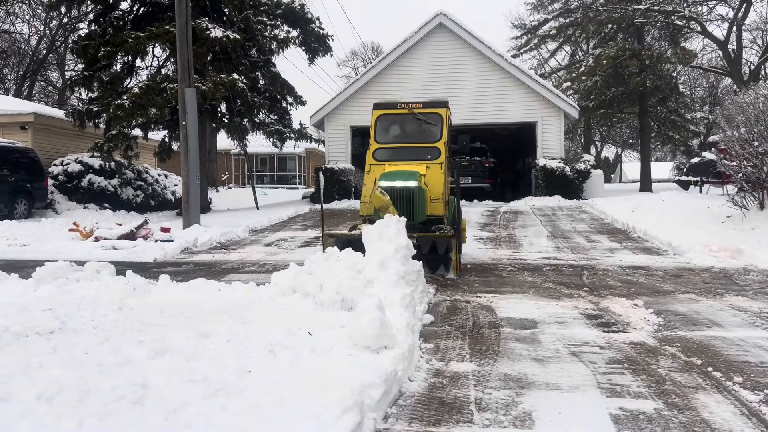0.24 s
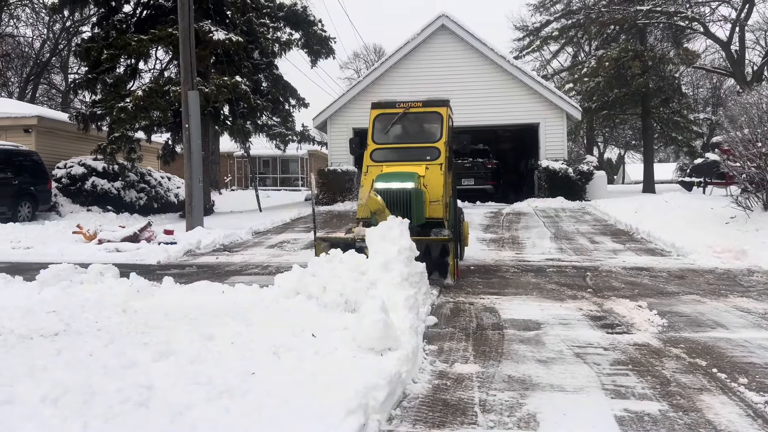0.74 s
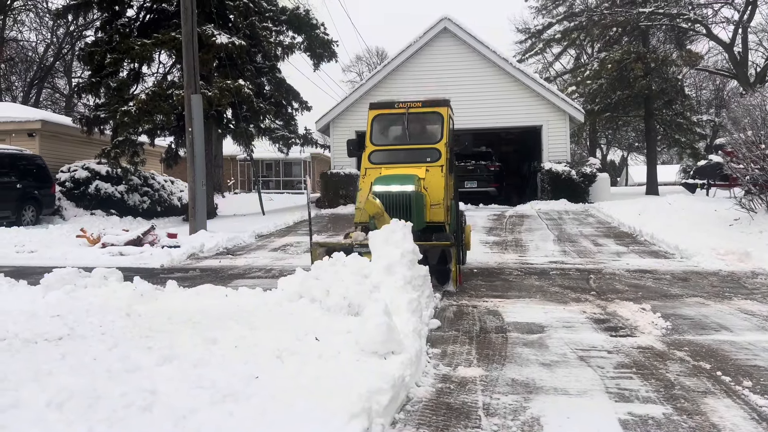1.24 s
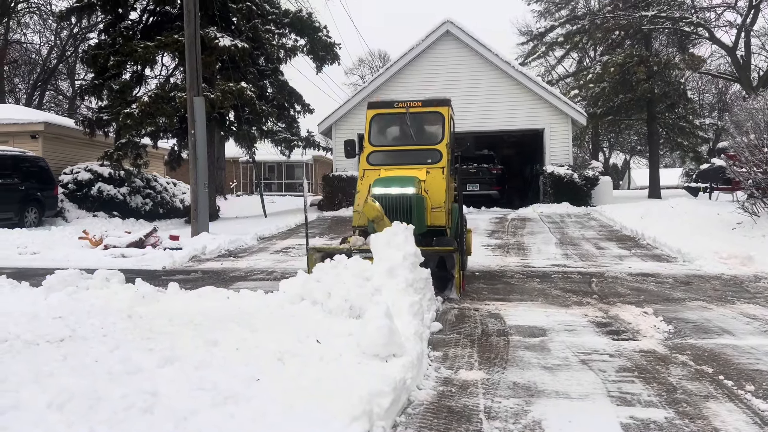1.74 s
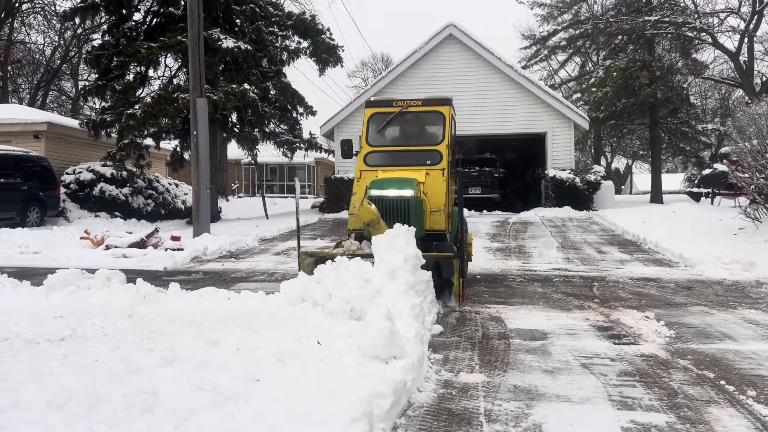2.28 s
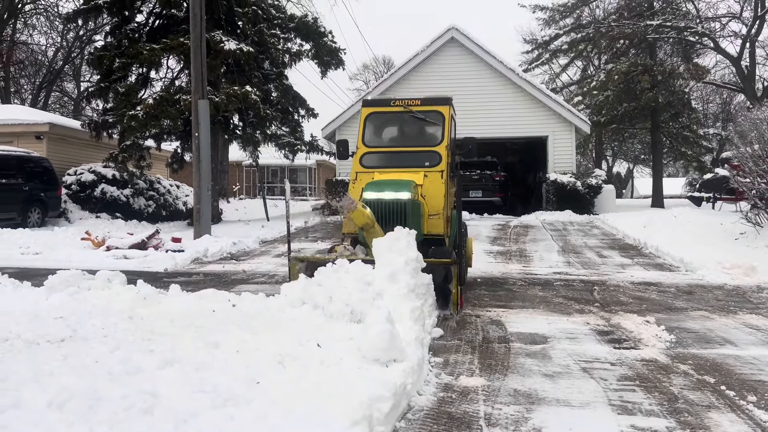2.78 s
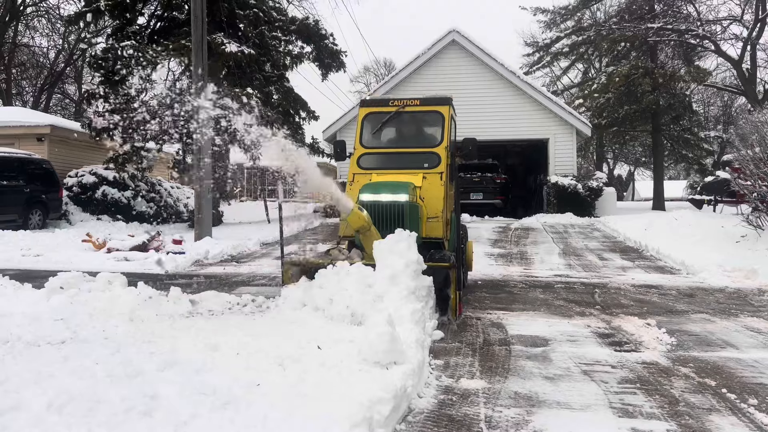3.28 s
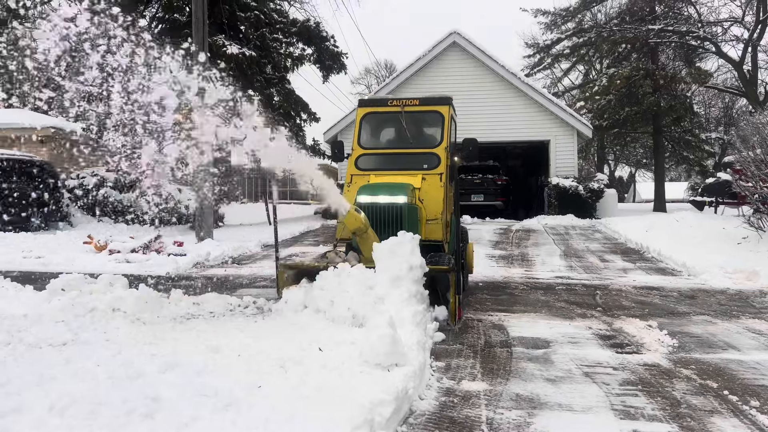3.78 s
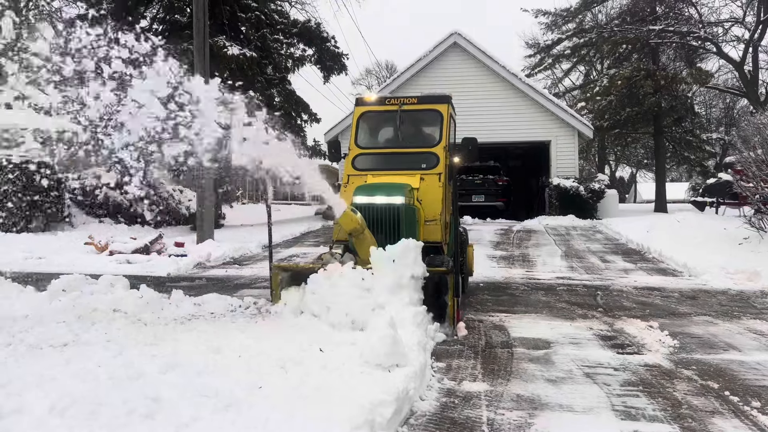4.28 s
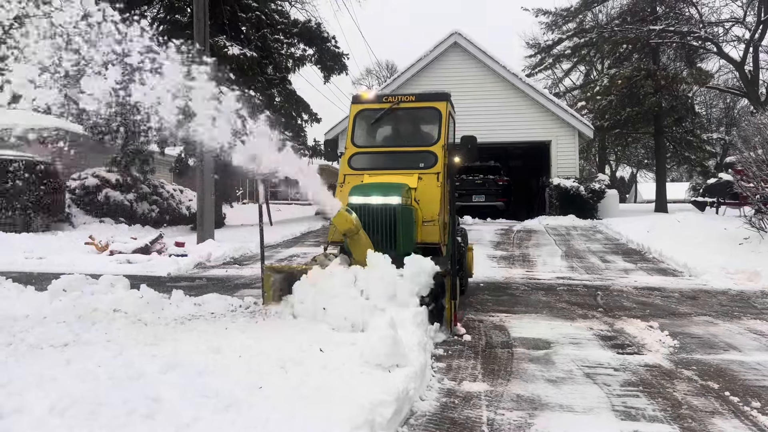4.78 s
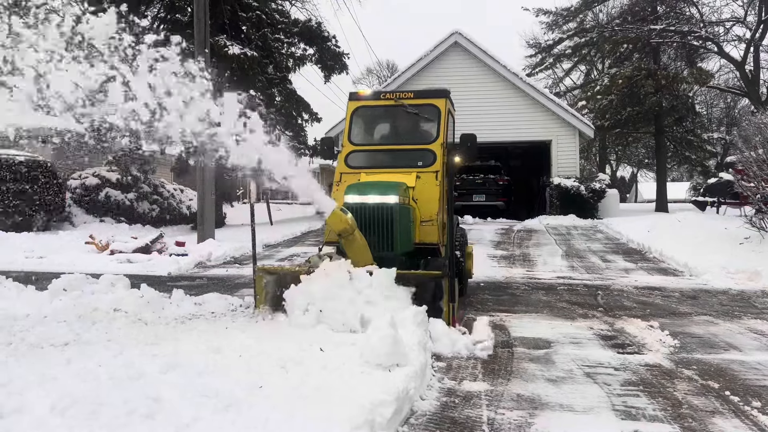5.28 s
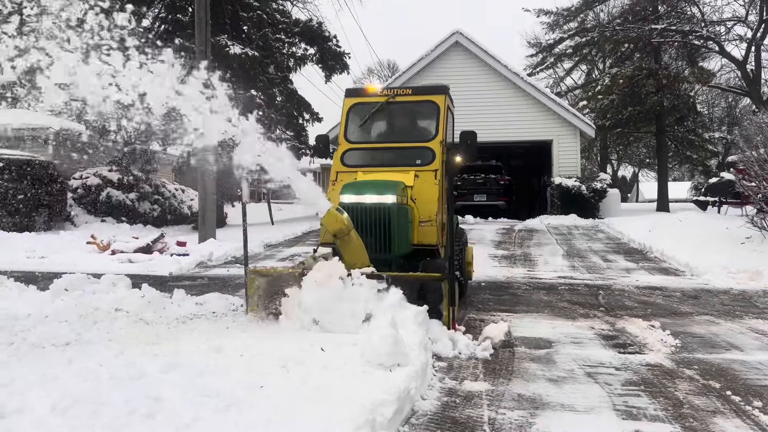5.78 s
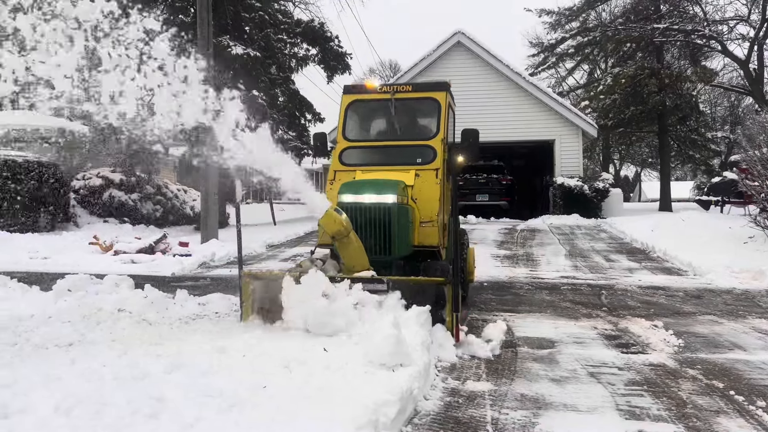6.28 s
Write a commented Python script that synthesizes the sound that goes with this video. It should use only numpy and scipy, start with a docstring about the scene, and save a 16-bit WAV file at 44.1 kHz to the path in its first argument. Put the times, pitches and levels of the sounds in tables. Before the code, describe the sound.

A low twin-cylinder exhaust throb and belt-driven blower run together, their close pitches beating slowly. Clatter and airy rush grow gradually. Midway the blower meets heavy snow, the engine sags and partly recovers, housing and gear case ring and buzz, and low churning surges join a bright pulsing spray. Heard in the open air, in stereo, from a few metres ahead, slowly approaching, without a stop.

```python
"""A hum with a slow beat comes first: the exhaust of a twin-cylinder garden tractor and its front snowblower.
The exhaust sums sines on the orders of the crank, which sags as the blower bites into a wet snow bank; the
belt-driven blower sums orders of a slightly slower shaft and beats against it. Gear meshes whine as sines on
multiples of the crank speed; knocks, roar, snow rush and spray are noise and blows gated once a turn and
filtered; noise rings the metal, snow lumps rumble, and two ports each hear all this with level and lag."""
import sys
import numpy as np
from scipy import signal
from scipy.fft import rfft, irfft, next_fast_len
from scipy.io import wavfile
from scipy.ndimage import uniform_filter1d

SR = 44100
rng = np.random.default_rng(int(sys.argv[2]) if len(sys.argv) > 2 else 0)


def materialize(psi):
    """Save the field psi as 16-bit PCM at rate SR to the path in sys.argv[1].

    A 1-D psi becomes a single channel; in a 2-D psi each row is a channel.
    """
    bounded = np.clip(np.atleast_2d(psi).T, -1, 1)
    quanta = np.round(bounded * 32767).astype(np.int16)
    wavfile.write(sys.argv[1], SR, quanta)


N = 287973
SIZE = next_fast_len(N)  # transform length, samples
TIME_S = np.arange(N) / SR
BITE_S, BITE_RISE_S = 3.0, .62  # the blower meets the bank; time to full load


def exhaust(turns, first_db, bite):
    """Harmonic synthesis: orders of the crank sum to a periodic hum; half orders come from uneven firing."""
    # exhaust orders above the first: (order, level at the outset [dB], growth on coming closer [dB/s],
    # lift under load [dB], waver [dB])
    exhaust_orders = [(2, -27, 1.45, -2, .4), (2.5, -44, .9, 4.5, 2.5), (3, -25.5, 0, 0, .3),
                      (3.5, -58, 0, 14, 3), (4, -42, 1.1, -.5, 2), (5, -50, .3, 10, 3),
                      (5.5, -53, .5, -1, 3), (6, -53, .3, 10, 1.5), (6.5, -49, .8, 2.5, 1.5),
                      (7, -51, 0, -1, 3), (7.5, -48, .8, -2.5, 2), (8, -48, 1, -4, 2),
                      (8.5, -51, .8, -6, 3), (9, -58, 0, 13, 2), (9.5, -52, 0, 1, 3), (10.5, -51, 1, 1, 2),
                      (11, -50, 0, .5, 2), (12, -47.5, 0, 0, 1.5), (12.5, -54, .5, -2, 3),
                      (13.5, -52, .5, -10, 2)]
    first = harmonic(turns, first_db, waver_db=0.33, order=1)
    return first + stack(turns, exhaust_orders, bite)


def blower(hz, bite):
    """Beating: belt slip, greater under load, slows this shaft, so its orders drift behind the exhaust's."""
    # blower orders: (order of its own shaft, level at the outset [dB], growth on coming closer [dB/s],
    # lift under load [dB], waver [dB])
    blower_orders = [(1.5, -49, 1.7, 3, 2.9), (2, -50.5, 1.35, 10.5, 1.2), (2.5, -50, .62, 14.5, 2),
                     (3, -44.5, 2, .5, 1.5), (3.5, -53, .7, 8.5, 1.8), (4, -45.5, 1.7, -1, 1),
                     (4.5, -50, 1.6, -5, 2.5), (5, -46.5, 2.6, -12.5, 2.5), (5.5, -50, 2.2, -11, 2),
                     (7.5, -62, 0, 13, 2), (10, -46, 0, -1, 3)]
    slip_light, slip_loaded = .0147, .018  # share of the crank speed lost in the belt
    behind_turns = .355  # lag of the blower's angle at the outset
    extra_db_per_hz, extra_below_hz = 1.5, 50.3  # extra lift only below 50.3 Hz, which this crank never reaches
    slip = slip_light + (slip_loaded - slip_light) * bite
    turns = np.cumsum(hz * (1 - slip)) / SR - behind_turns
    extra_db = extra_db_per_hz * np.maximum(extra_below_hz - hz, 0)
    return -undb(extra_db) * stack(turns, blower_orders, bite)


def stack(turns, orders, bite):
    """Superposition: the orders of one shaft add, each with its own growth, load lift and phase."""
    from_rad, per_order_rad = 1.0, -1.15  # phase at the outset for order 2; change per order
    to_rad, slide_s = -1.3, 3.8  # phase that orders up to 3 slide to; time taken
    aligned_orders = 3  # higher orders add a random offset
    tones = 0
    for order, db, closer_db, load_db, waver_db in orders:
        outset = from_rad + per_order_rad * (order - 2)
        slide = outset + (to_rad - outset) * ramp(0, slide_s)
        if order > aligned_orders:
            slide = slide + 2 * np.pi * rng.random()
        level_db = db + closer_db * TIME_S + load_db * bite
        tones = tones + harmonic(turns, level_db, waver_db, order, slide)
    return tones


def harmonic(turns, db, waver_db, order, slide=0):
    """Order tracking: a sine locked to the shaft angle, of wavering size and phase; db is its rms level."""
    phase_waver = .04  # radians per order
    phase = 2 * np.pi * order * turns + slide + phase_waver * order * walk(9)
    return -np.sqrt(2) * undb(db + waver_db * walk(10)) * np.sin(phase)


def gears(turns, hz, bite):
    """Tooth-mesh tones: lines at multiples of crank speed, blurred by frequency jitter, varying with load."""
    # gear meshes: (multiple of crank speed, peak level at the outset before the sag lift [dB],
    # growth on coming closer [dB/s], lift under load [dB], lift per crank sag [dB/Hz], blur [Hz])
    meshes = [(18.02, -49, 2.2, -12, 0, 1.), (18.42, -53, 1.9, 1.5, 3.5, 1.), (36.23, -72, 0, 28, 9, 1.),
              (38.1, -72, 0, 25, 7, 1.5), (55.35, -68, 1.5, 13, 0, 4)]
    mesh_hz, most_sag_hz = 52.4, 1.1  # sag counts from this crank speed; no more lift past this sag
    flicker_db = 1.3
    sag = np.clip(mesh_hz - hz, 0, most_sag_hz)
    tones = 0
    for multiple, db, closer_db, load_db, sag_db, blur_hz in meshes:
        drift = np.cumsum(blur_hz * walk(40)) / SR
        level_db = db + closer_db * TIME_S + load_db * bite + sag_db * sag
        level_db = level_db + flicker_db * walk(9)
        tones = tones + undb(level_db) * np.sin(2 * np.pi * (multiple * turns + drift))
    return tones


def rushes(turns, rattle_db, strain_db):
    """Superposition of broadband sources: engine noise, rush and spray of the chute, ringing metal."""
    # broadband levels: (time [s], low roar [dB], clatter [dB], air and snow rush [dB])
    roar_db, clatter_db, rush_db = played([(0, -29.5, -36, -38), (.5, -31.5, -36, -37),
                                           (1.4, -30.5, -35, -33.5), (2.2, -28.5, -33.5, -34.5),
                                           (3.0, -28.5, -33, -33.5), (3.7, -28.5, -33, -32.5),
                                           (4.4, -27, -31, -31), (5.4, -28, -31.5, -30.5),
                                           (6.53, -26.5, -30, -31.5)])
    engine = block(turns, roar_db, clatter_db)
    thrown = chute(turns, rush_db) + spray(turns, rush_db)
    return engine + thrown + housing(rattle_db, strain_db)


def block(turns, roar_db, clatter_db):
    """Amplitude modulation: noise throbs once a turn, joined by knocks, and is shaped into roar and clatter."""
    # low roar of fan and belts: (frequency [Hz], relative spectrum level [dB])
    roar_slope = [(30, -10), (45, -16), (65, 2.5), (100, 6.5), (150, 4.2), (220, 0.5), (350, -3.5),
                  (500, -1), (620, -3.5), (750, -8), (1000, -20), (3000, -65)]
    # clatter of block and blower: (frequency [Hz], relative spectrum level [dB])
    clatter_slope = [(200, -62), (500, -55), (750, 0), (1200, 0.5), (1600, -4.5), (2000, -3.5),
                     (2500, -9.5), (4000, -20), (9000, -60)]
    # resonances on the clatter: (frequency [Hz], width [Hz], lift [dB])
    clatter_rings = [(1155, 31, 6), (1270, 38, 4.5), (1471, 60, 8), (1587, 40, 6)]
    gate = 1 + 0.75 * puffs(turns + 0.055, 0.35, scatter_db=1.7, odd_db=-1.5)
    hum = unit(gate * rng.standard_normal(N)) + 0.19 * knocks(turns)
    shake = unit(gate * rng.standard_normal(N)) + 0.19 * knocks(turns)
    roar = undb(roar_db + 0.55 * walk(6.7)) * coloured(hum, roar_slope, [])
    clatter = undb(clatter_db + 0.99 * walk(9.)) * coloured(shake, clatter_slope, clatter_rings)
    return roar + clatter


def knocks(turns):
    """Impulse excitation: one sharp blow a turn, a little early or late and uneven in size."""
    at = np.flatnonzero(np.diff(turns.astype(int)))
    late, size = rng.standard_normal((len(at), 2)).T
    shift = (SR * .0002 * late).astype(int)  # 0.2 ms spread
    blows = np.zeros(N)
    blows[np.clip(at + shift, 0, N - 1)] = -undb(3.0 * size)
    return unit(blows)


def puffs(turns, length, scatter_db, odd_db):
    """Periodic gating: a Gaussian pulse each turn, of its own size; odd_db offsets every second one."""
    turn = turns.astype(int)
    scatter = rng.standard_normal(turn[-1] + 1)[turn]
    size = undb(scatter_db * scatter + odd_db * (turn % 2))
    return size * np.exp(-((turns - turn - .5) / length) ** 2)  # length in turns


def chute(turns, rush_db):
    """Duct resonance: noise of air and snow, throbbing once a turn, excites the chute's resonances."""
    # rush in the chute: (frequency [Hz], relative spectrum level [dB])
    chute_slope = [(300, -62), (800, -7.5), (1800, 3), (2400, -3), (3300, -2), (4200, -4), (5500, -2),
                   (6800, -4.5), (7500, -8), (8700, -8), (10400, -11), (12200, -10), (13200, -25),
                   (15500, -10.5)]
    # chute resonances: (frequency [Hz], width [Hz], lift [dB])
    chute_rings = [(2920, 650, 6), (3240, 220, -4), (3960, 69, 4.5), (4490, 380, 6.5), (4820, 100, -2.5),
                   (5350, 120, -3), (5930, 420, -6), (6070, 93, 7), (6660, 200, 6.5)]
    gate = 1 + 0.45 * puffs(turns + 0.55, 0.22, scatter_db=2.5, odd_db=-1.5)
    gate = gate * undb(0.5 * walk(7.5))
    return undb(rush_db) * coloured(gate * rng.standard_normal(N), chute_slope, chute_rings)


def spray(turns, rush_db):
    """Bursts of high-frequency noise: bright spray once a turn, growing faster than the rush."""
    base_db, db_per_rush_db = -43, 3  # level at a rush of -33 dB; growth per dB of rush
    # (frequency [Hz], relative spectrum level [dB])
    slope = [(2000, -70), (5000, -8), (8500, -1.5), (10500, -2.0), (13000, -5.0), (15500, -5)]
    gate = .5 + puffs(turns + 0.23, 0.26, scatter_db=2.2, odd_db=-2.7)
    swell = undb(1.7 * walk(7.8))
    burst = gate * swell * rng.standard_normal(N)
    return undb(base_db + db_per_rush_db * (rush_db + 33)) * coloured(burst, slope, [])


def housing(rattle_db, strain_db):
    """Modal excitation: snow rattles panels, strain shakes the gear case; early, higher modes fade under load."""
    # sheet-metal housing modes: (frequency [Hz], width [Hz], level before the rattle gain [dB])
    housing_modes = [(3690, 370, -40.5), (5980, 200, -41), (2626, 22, -48.5), (2884, 16, -45),
                     (3797, 20, -51), (5090, 230, -38), (6450, 90, -42)]
    # gear case modes: (frequency [Hz], width [Hz], level before the strain gain [dB])
    case_modes = [(1837, 92, -41.5), (1913, 56, -41.5)]
    # early, higher metal resonances: (frequency [Hz], width [Hz], level at the outset [dB])
    early_modes = [(3000, 230, -53.5), (3980, 110, -54.5), (4550, 160, -50.5), (5100, 120, -52.5),
                   (6100, 160, -56.5), (6660, 97, -58.5)]
    closer_db_per_s, loaded_db = 2.5, -8.5
    early_db = closer_db_per_s * TIME_S + loaded_db * ramp(BITE_S, BITE_RISE_S)
    return rattle(housing_modes, rattle_db) + rattle(case_modes, strain_db) + rattle(early_modes, early_db)


def rattle(modes, db):
    """Resonance: noise drives narrow bandpass modes, each flaring up and fading on its own."""
    rings = 0
    for hz, width, mode_db in modes:
        b, a = signal.iirpeak(hz, hz / width, SR)
        mode = unit(signal.lfilter(b, a, rng.standard_normal(N)))
        rings = rings + undb(mode_db + 1.6 * walk(20)) * mode
    return rings * undb(db)


def churn(bite):
    """Low-frequency noise with random modulation: snow lumps rumble in surges as the auger digs deeper."""
    # churning lumps: (frequency [Hz], relative spectrum level [dB])
    churn_slope = [(40, -30), (75, -1), (110, 6), (140, -2.5), (200, -8.5), (300, -20), (600, -55)]
    base_db, deeper_db_per_s, surge_db = -34.5, 1.2, 3.5
    level_db = base_db + deeper_db_per_s * (TIME_S - BITE_S) + surge_db * walk(4.3)
    return bite * undb(level_db) * coloured(rng.standard_normal(N), churn_slope, [])


def undb(db):
    """Logarithmic level: decibels to amplitude gain."""
    return 10 ** (np.asarray(db) / 20)


def unit(x):
    """Normalisation to an rms of 1."""
    return x / np.sqrt(np.mean(x ** 2))


def ramp(start_s, rise_s):
    """Linear onset: 0 before the start, 1 after the rise."""
    return np.clip((TIME_S - start_s) / rise_s, 0, 1)


def walk(rate):
    """Slow random modulation of rms 1: levels held 1 / rate s, smoothed by two moving averages."""
    k = int(SR / rate)
    held = np.repeat(rng.standard_normal(N // k + 1), k)
    smooth = uniform_filter1d(uniform_filter1d(held, k), k)
    return unit(smooth[:N])


def played(table):
    """Linear interpolation in time: columns of a curve table, one value a sample."""
    s, *columns = np.transpose(table)
    return [np.interp(TIME_S, s, c) for c in columns]


def over_hz(table):
    """Interpolation on log frequency: columns of a spectrum table, one value a bin."""
    hz, *columns = np.transpose(table)
    bins = np.log(np.maximum(np.fft.rfftfreq(SIZE, 1 / SR), 1))
    return [np.interp(bins, np.log(hz), c) for c in columns]


def coloured(x, slope, rings):
    """Source-filter shaping: a broad spectral slope with resonances on top, scaled to rms 1."""
    bins = np.fft.rfftfreq(SIZE, 1 / SR)
    db = over_hz(slope)[0]
    for hz, width, lift_db in rings:
        db = db + lift_db / (1 + (2 * (bins - hz) / width) ** 2)
    return unit(irfft(rfft(x, SIZE) * undb(db), SIZE)[:N])


def scene():
    """Partial coherence: the ports share direct sound, scatter apart, and differ in level and phase."""
    # crank: (time [s], crank speed [Hz], rms level of the first order [dB])
    hz, first_db = played([(0, 53.78, -23.5), (.8, 53.37, -23), (1.3, 53.48, -24), (1.75, 53.56, -24),
                           (2.2, 53.93, -26), (2.5, 54.33, -23.5), (2.95, 52.98, -24), (3.3, 52.74, -23.5),
                           (3.72, 51.19, -22), (3.92, 50.52, -18.5), (4.48, 52.7, -21.5), (4.9, 52.73, -19),
                           (5.3, 52.3, -22), (5.7, 51.85, -20), (6.0, 51.82, -18.5), (6.53, 52.18, -22)])
    # microphone ports: (frequency [Hz], left leads [rad], left minus right [dB], shared power [0-1])
    lead, pan_db, like = over_hz([(52, 0., 1.4, 1), (105, -0.32, 1.2, 1), (158, -0.44, -0.3, 1),
                                  (330, -0.5, -3.4, 0.96), (520, -0.1, -10, 0.85), (766, 1.6, -2, 1),
                                  (950, 0.52, 5, 0.68), (1280, 0, 0, 1), (1540, 0.35, 0, 0.88),
                                  (1800, 1, -5.5, 0.7), (2050, 0.67, -0.5, 0.7), (2780, 1.74, 4, .8),
                                  (3100, 1.5, 7.5, 0.73), (3830, 0.18, 1, 0.84), (4400, 1.5, -0.5, 0.75),
                                  (5320, 1.5, 7.5, 0.97), (6000, -0.8, -3, 0.3), (6520, 1.32, 2.5, 0.7),
                                  (7070, 1.5, -3.5, 0), (7960, 3, -8, 0.03), (8660, -0.3, -6, .9),
                                  (9050, -3, 8, .9), (10440, -2, -6, .9), (11540, -6.5, 2, 0.6),
                                  (14400, -10, -2, .9), (16100, -12.5, 1, .97)])
    turns, bite = np.cumsum(hz) / SR, ramp(BITE_S, BITE_RISE_S)

    rattle_light_db, rattle_loaded_db, rattle_rise_s = -12, 1.5, 3.06  # rise centred on the bite
    rattle_rise = ramp(BITE_S - rattle_rise_s / 2, rattle_rise_s)
    rattle_db = rattle_light_db + (rattle_loaded_db - rattle_light_db) * rattle_rise

    strain_light_db, strain_loaded_db, strain_db_per_hz = -25, -8, 3  # before the lift per Hz of sag
    reference_hz = 54.6  # reference crank speed from which the sag is counted
    strain_db = strain_light_db + (strain_loaded_db - strain_light_db) * bite ** 2
    strain_db = strain_db + strain_db_per_hz * (reference_hz - hz)

    tones = exhaust(turns, first_db, bite) + blower(hz, bite) + gears(turns, hz, bite) + churn(bite)
    like, pan_db = np.clip(like, 0, 1), np.clip(pan_db, -10, 10)
    direct = rfft(tones, SIZE) + np.sqrt(like) * rfft(rushes(turns, rattle_db, strain_db), SIZE)
    ports = []
    for side in (1, -1):  # left, right
        scattered = np.sqrt(1 - like) * rfft(rushes(turns, rattle_db, strain_db), SIZE)
        port_response = undb(side * pan_db / 2) * np.exp(.5j * side * lead)
        ports.append(irfft((direct + scattered) * port_response, SIZE)[:N])
    return np.array(ports)


def record(dry):
    """Band limiting: a steep elliptic low-pass removes the top above 15.8 kHz."""
    top_hz = 15800
    lowpass = signal.ellip(14, .2, 80, top_hz, fs=SR, output="sos")
    return signal.sosfilt(lowpass, dry)


dry = scene()
out = record(dry)
materialize(out)
```